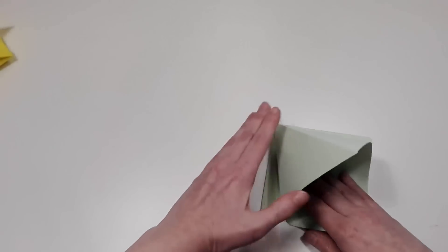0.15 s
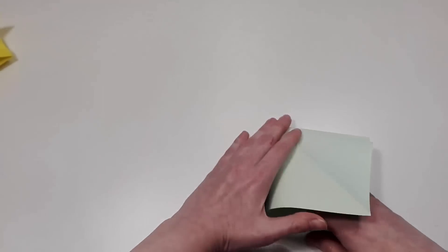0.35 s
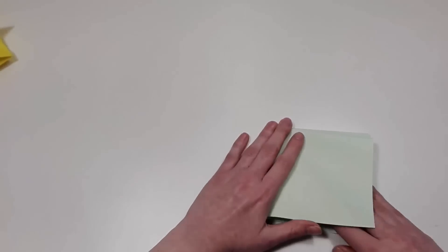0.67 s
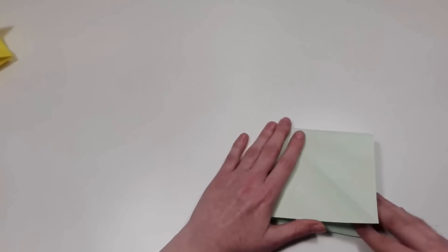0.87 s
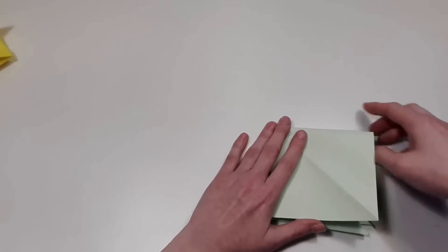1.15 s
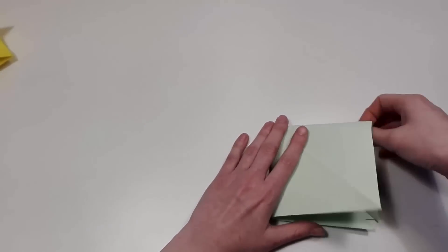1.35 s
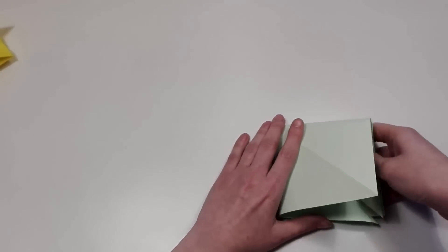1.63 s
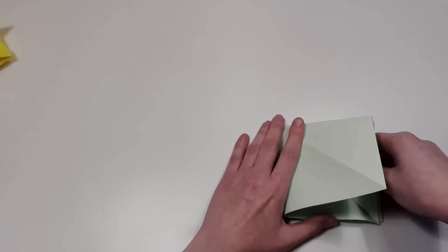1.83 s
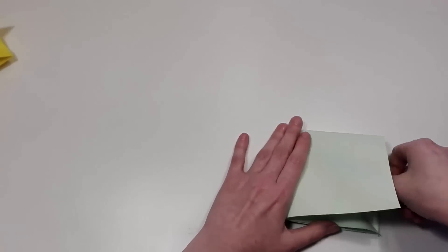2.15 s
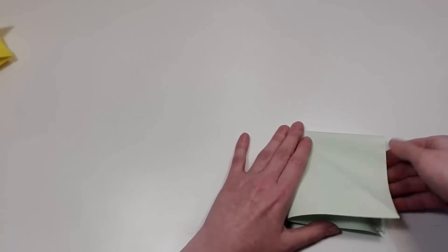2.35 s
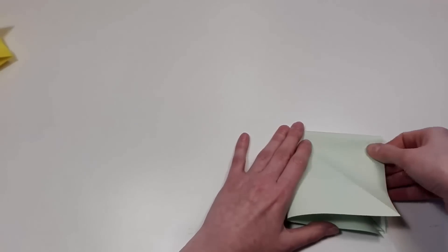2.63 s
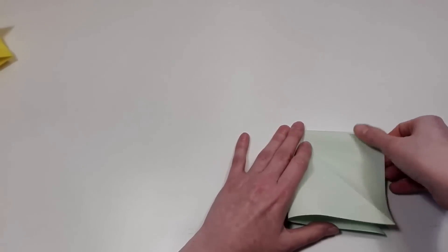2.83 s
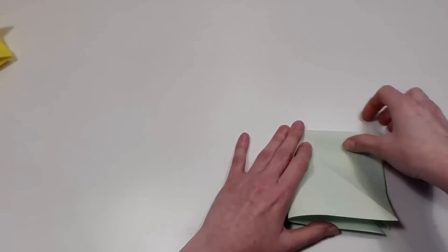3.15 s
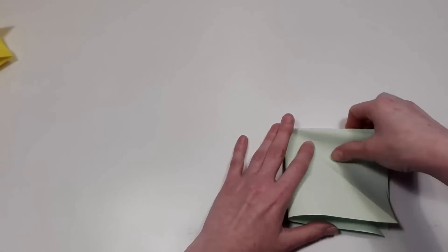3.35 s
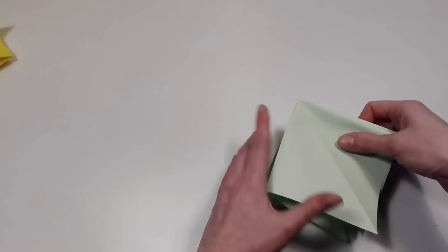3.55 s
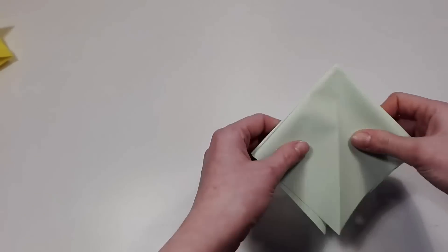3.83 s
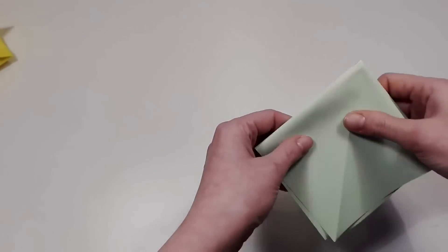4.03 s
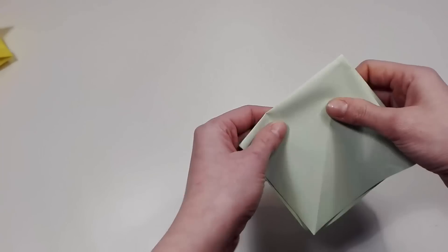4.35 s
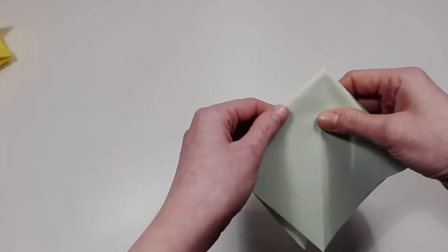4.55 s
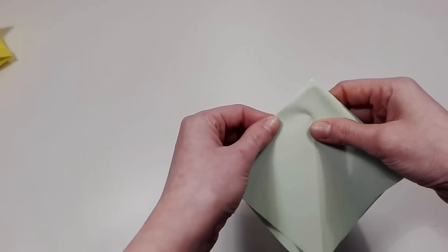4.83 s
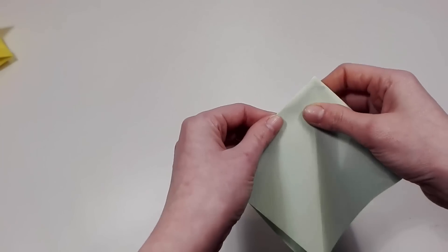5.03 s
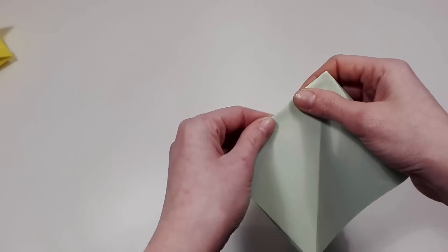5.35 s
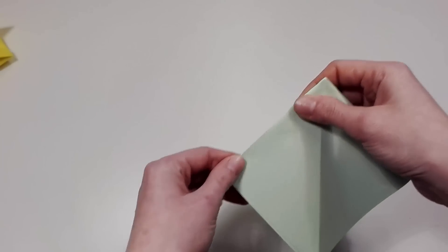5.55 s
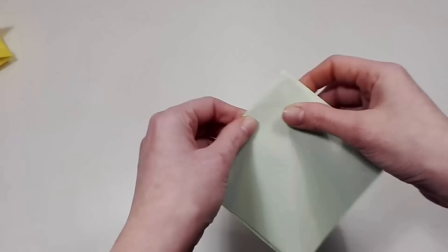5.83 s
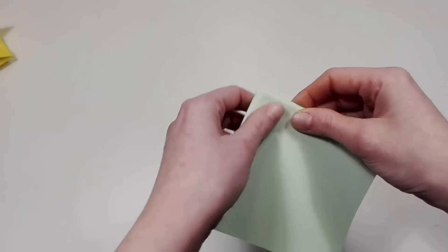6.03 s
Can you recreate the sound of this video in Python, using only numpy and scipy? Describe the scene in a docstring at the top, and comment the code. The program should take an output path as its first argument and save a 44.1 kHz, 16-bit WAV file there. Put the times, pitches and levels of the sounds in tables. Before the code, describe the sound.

Stiff paper snaps and crinkles as hands fold it close by, with soft rubbing and a few light table bumps in a quiet room.

```python
"""A sheet of paper snaps as hands fold and crease it, close to a small camera microphone in a quiet room.
Each buckling releases elastic energy in a burst of slips that cracks and rings a panel of the sheet,
and the room answers with a short tail. Friction of fingers and layers adds a fine hiss. The sheet lies
on a table at first and is later held in the air, where the fingers damp it. Hands bump and knock the
table and the microphone stand sways, over a faint room rumble."""
import sys
import numpy as np
from scipy import signal
from scipy.io import wavfile
from scipy.ndimage import uniform_filter1d

SR = 44100
rng = np.random.default_rng(int(sys.argv[2]) if len(sys.argv) > 2 else 0)


def int16_out(signal):
    """Quantize to a 16-bit WAV file."""
    q = np.round(np.clip(np.atleast_2d(signal).T, -1, 1) * 32767)
    wavfile.write(sys.argv[1], SR, q.astype(np.int16))


N = 272538
LIFT_S, LIFTED_DB = 3.6, -5.5  # from this time the sheet is held in the air and its panels settle quieter
PANEL_CARRY = 0.79  # share of the panel's dB that carries into the settling

# Buckling snaps. Each row: start in seconds, level in dB, crack centre in Hz, panel ring in dB,
# panel pitch in Hz, top fizz in dB, table push in dB. Ring, fizz and push are relative to the level.
SNAPS = [(0.0074, -24, 4760, -1, 1140, -35, -50), (0.17, -41, 2840, -1, 1720, -17, -17),
         (0.195, -37.5, 3040, -0.5, 1220, -22, -31), (0.277, -49.5, 2420, 6.5, 1160, -16, -9),
         (0.3195, -46.5, 2480, 13.5, 1800, -24, -27), (0.6002, -37, 4460, -1, 1440, -40, -24),
         (0.613, -35, 3180, -2, 1620, -32, -37), (0.667, -9.5, 2250, -4.5, 1580, -46, -41),
         (0.8122, -34.5, 5570, -1.5, 1900, -20, -37), (1.0054, -38.5, 5260, -12, 2150, -17, -32),
         (1.1865, -40.5, 5200, -0.5, 1120, -18, -5), (1.233, -12, 2570, -1.5, 2160, -52, -28),
         (1.3081, -28, 2650, 8, 1440, -27, -8), (1.3389, -23.5, 5530, -4, 1900, -31, -16.5),
         (1.4062, -19.5, 3660, -0.5, 1194, -5, -42), (1.4185, -30.5, 3860, 13, 1510, -31, -14),
         (1.5182, -5.5, 4880, -3.5, 1286, -33, -24), (1.7809, -19.5, 5150, -20.5, 1430, -16, -42),
         (1.828, -31.5, 4860, 13.5, 1140, -20, -43), (1.934, -22, 3340, -7.5, 1130, -30, -34),
         (1.989, -25, 3370, -10, 1950, -20, -38), (2, -23, 3530, -18, 2050, -35, -44),
         (2.01, -24, 3330, -11, 1460, -31, -44), (2.1458, -7.5, 4100, -13, 1780, -21, -51),
         (2.1676, -26, 3550, 2, 1360, -19, -12), (2.1815, -20.5, 3900, -1, 1270, -4.5, -18),
         (2.2684, 1, 5500, -8.5, 1404, -18, -30), (2.3799, -26.5, 5050, 0, 1300, -21, -42),
         (2.411, -26, 5000, -1, 1260, -16, -50), (2.42, -21, 5740, -11, 1800, -15, -46),
         (2.564, -41, 5050, 2, 2120, -22, -38), (2.611, -2, 4860, -7, 1186, -34, -56),
         (2.8062, -27.5, 5140, -13.5, 1280, -28, -46), (2.9195, -31.5, 2870, -12, 2000, -21, -47),
         (3.0094, -3, 2870, -15.5, 2090, -17, -63), (3.0247, -18, 4130, -9, 1750, -14, -44),
         (3.0324, -35, 2940, 7, 1850, -4, -39), (3.0677, -9, 5140, -6.5, 2250, -21, -33),
         (3.0696, -2, 4700, -19, 1300, -20.5, -44.5), (3.1744, -34.5, 5070, -3.5, 1140, -28, -6),
         (3.2823, -43.5, 4160, -3, 2090, -35, -10), (3.722, -38.5, 4750, -6.5, 1280, -18, -13),
         (4.046, -35, 5420, -9.5, 2100, -28, -22), (4.071, -26, 4210, -8, 1880, -20.5, -23),
         (4.0865, -1, 4520, -12, 2100, -30, -27), (4.2053, -37.5, 3310, 2.5, 1960, -22, -2),
         (4.3806, -27, 3250, 3, 1140, -34, -13), (4.4832, -38, 3810, -3, 2000, -19, -19),
         (4.712, -15, 3530, 0.5, 1190, -23.5, -22), (4.7589, -27, 3380, 3, 1210, -39, -24),
         (4.9188, -16, 3640, -12, 1870, -25, -31), (5.07, -34.5, 3300, -4.5, 1083, -42, -17.5),
         (5.3415, -13.5, 3480, -2, 2160, -37, -63), (5.827, -34, 5200, -3, 1920, -21, -11),
         (5.8566, -36.5, 2900, 2, 1800, -25, -6.5), (5.9397, -33.5, 5170, 0, 900, -28, -12),
         (6.0236, -42, 4910, 0, 1770, -21, -6.5), (6.1332, -37.5, 4510, 3.5, 1220, -21, -14)]


def buckling_snaps():
    """Snap-through buckling: a crease gives way in slips that crack, ring a panel and push the table."""
    direct, sends = np.zeros(N), np.zeros((3, N))
    ms, rise_ms = np.arange(1500) / SR * 1000, 0.694
    past_peak_ms = np.maximum(ms - rise_ms, 0)
    attack = np.minimum(ms / rise_ms, 1) ** 2
    flip = 2 * np.exp(-((ms - rise_ms) / 0.053) ** 2)  # the fold flips at the top of the burst
    shape = len(SNAPS), len(ms)
    slips = rng.standard_normal(shape) * gain_of(4.6 * rng.standard_normal(shape))
    hum_t = np.arange(8000) / SR
    shivers = rng.standard_normal((len(SNAPS), len(hum_t))) * np.exp(-hum_t / 0.053)
    for k, (start, db, crack_hz, panel_db, panel_hz, fizz_db, push_db) in enumerate(SNAPS):
        lifted = start > LIFT_S
        decay_scale, ring_share, room_db = (0.62, 0.33, -22) if lifted else (1, 0.51, -23.5)
        # a harder snap is shorter and sharper; faint ones crackle longer
        decay_ms = max(2.11 - 0.29 * db, .5) * decay_scale
        burst = slips[k] * attack * np.exp(-past_peak_ms / decay_ms) + flip
        treble_fade = np.exp(-past_peak_ms / 35)
        treble = band(band(burst * treble_fade, 2280, 7140), 2280, 7140)
        crack = 0.32 * ring(treble, crack_hz, width_hz=540) + 0.51 * treble
        sheet = band(burst, 1000, 2266)
        panel = ring_share * ring(sheet, panel_hz, width_hz=140) + (1 - ring_share) * sheet
        flash = burst * np.exp(-abs(ms - rise_ms) / .8)
        fizz = gain_of(fizz_db) * band(flash, 7300, 12000)
        bite = gain_of(-14 + 6.3 * db) * band(flash, 7300, 16000)  # heard only in the hardest snaps
        push = gain_of(push_db) * band(burst, 176, 1190)
        fringe = fizz + bite + push
        add(direct, start - .0004, gain_of(db) * (crack + gain_of(panel_db) * panel + fringe))
        # the struck panel hums on while the sheet settles
        hum_db = db + PANEL_CARRY * panel_db - 20 + LIFTED_DB * lifted
        add(direct, start, gain_of(hum_db) * ring(shivers[k], panel_hz, width_hz=215))
        # the room blurs the rings, and each spot of the sheet meets other echoes
        add(sends[k % 3], start, gain_of(db + room_db) * (treble + gain_of(panel_db) * sheet + fringe))
    return direct + sum(signal.oaconvolve(send, room_response())[:N] for send in sends)


# Spectra of friction hiss, sheet body and dry fizz. Each row: frequency in Hz, relative density in dB.
HISS_SPECTRUM = [(1060, -81), (1800, -18), (1960, 0), (2640, -1.5), (3260, 4.5), (4120, 1), (5250, 4.5),
                 (5970, 0), (9000, -18.5), (11700, -37.5), (19800, -120)]
BODY_SPECTRUM = [(290, -50), (500, -44.5), (938, -8), (1250, -1.5), (1490, -9.5), (2040, -1.5),
                 (2360, -4.5), (3200, -6), (4160, -11), (7040, -120)]
FIZZ_SPECTRUM = [(3820, -52), (6500, 10), (8400, 1.5), (9800, 2.5), (11500, -7.5), (13000, -6.5),
                 (14000, -9.5), (14600, -4.5)]
# Strokes of fingers and layers. Each row: time of reaching full level, hold, 20 dB rise and 20 dB fall
# in seconds, levels of hiss, body and fizz in dB, hiss centre in Hz.
STROKES = [(0.0, 0.031, .01, 0.04, -49, -53, -55.5, 5030),
           (0.175, 0.024, 0.013, 0.071, -56, -53, -64.5, 3580),
           (0.313, 0.035, 0.036, 0.14, -70, -57, -73, 4090), (0.514, .08, 0.043, .1, -58, -58, -66, 4880),
           (0.63, 0.16, 0.12, 0.1, -47.5, -54, -59, 4100), (0.779, .06, 0.082, 0.16, -48.5, -77, -51, 5780),
           (0.983, 0.022, 0.088, 0.032, -51, -58, -49.5, 5230),
           (1.282, 0.022, 0.069, 0.021, -37.5, -41.5, -44.5, 4560),
           (1.351, 0.048, 0.093, 0.17, -44, -46.5, -48.5, 4430),
           (1.552, 0.037, 0.054, 0.23, -43.5, -46.5, -51, 4400),
           (1.748, 0.082, 0.24, 0.14, -45.5, -55, -60, 4730),
           (1.81, 0.066, 0.057, 0.22, -64, -70, -55, 4900),
           (1.991, 0.029, .12, 0.07, -43.5, -46.5, -54.5, 3430),
           (2.151, 0.017, .03, 0.058, -36, -42, -41, 4340),
           (2.324, 0.079, 0.049, 0.092, -42.5, -47, -46, 4600),
           (2.561, 0.017, 0.016, 0.05, -55, -55, -60, 4630),
           (2.724, 0.018, 0.03, 0.043, -46, -49.5, -58, 3930),
           (2.805, 0.059, 0.024, 0.11, -46.5, -55.5, -55.5, 5020),
           (2.942, 0.028, .04, 0.039, -46, -56, -56, 4100),
           (2.997, 0.026, 0.045, 0.09, -37, -70, -45.5, 4040),
           (3.149, 0.062, .1, 0.055, -48, -63, -66, 4080), (3.285, .03, .01, 0.04, -47, -55, -54, 4460),
           (3.35, 0.042, 0.073, 0.045, -45.5, -56.5, -53, 4240),
           (3.458, .14, 0.11, 0.052, -57, -64.5, -63.5, 4600),
           (3.763, 0.05, 0.037, 0.13, -53.5, -60, -65, 4700),
           (3.943, 0.098, 0.19, 0.047, -48.5, -60.5, -60.5, 3990),
           (4.114, 0.073, 0.064, 0.1, -42, -54, -50, 4200),
           (4.294, 0.022, 0.061, 0.36, -44.5, -54.5, -52, 4020),
           (4.385, .06, 0.058, 0.077, -50, -55.5, -59, 4000),
           (4.484, 0.059, .04, 0.029, -42, -55, -52, 4460),
           (4.595, 0.058, 0.0074, 0.14, -47.5, -62, -59.5, 4140),
           (4.936, 0.024, 0.007, 0.15, -50, -63, -63.5, 4300),
           (5.051, 0.023, .05, 0.072, -49, -58.5, -60.5, 4300),
           (5.136, 0.04, 0.009, 0.03, -48, -76, -60, 4040),
           (5.277, 0.037, 0.14, 0.13, -49, -59.5, -66, 4500),
           (5.434, 0.029, 0.17, 0.12, -44.5, -66, -67, 5400),
           (5.487, 0.066, 0.16, 0.035, -43.5, -57, -43, 5070),
           (5.674, 0.037, 0.065, 0.028, -61.5, -67.5, -67, 4630),
           (5.832, 0.045, .01, .15, -51.5, -55, -63.5, 4350),
           (5.902, 0.055, 0.082, .12, -46.5, -56.5, -53, 4720),
           (6.025, .06, .06, 0.024, -49.5, -61, -56, 4760),
           (6.156, .04, 0.032, .1, -46.5, -50, -57.5, 4770)]


def sliding_friction():
    """Stick-slip friction: fibres catch and let go in every stroke and as each snap settles."""
    peak_s, hold_s, rise_s, fall_s, *stroke_levels, centre_hz = np.transpose(STROKES)
    snap_s, snap_db, _, panel_db, *_ = np.transpose(SNAPS)
    body_db = snap_db + PANEL_CARRY * panel_db + LIFTED_DB * (snap_s > LIFT_S)
    settle_levels = snap_db - 31.5, body_db - 31, snap_db - 51  # hiss, body, fizz
    settle_rise_s, settle_fall_s = 0.0027, 0.069

    def hiss_db(hz, t):
        """A spectral peak moves with the strokes; in the air the hiss loses its lower part."""
        peak = 12.2 * np.exp(-(np.log((hz + 1) / np.interp(t, peak_s, centre_hz)) / 0.47) ** 2)
        low_cut = -7 * (t > LIFT_S) / (1 + (hz / 3050) ** 10)
        return curve_at(HISS_SPECTRUM, hz) + peak + low_cut

    hiss = shaped_noise(hiss_db, size=512, patchy_db=2.5)
    body = shaped_noise(lambda hz, t: curve_at(BODY_SPECTRUM, hz), size=256, patchy_db=2.6)
    fizz = shaped_noise(lambda hz, t: curve_at(FIZZ_SPECTRUM, hz), size=256, patchy_db=2.5)
    catches = uniform_filter1d(rng.exponential(1, N) ** 2 - 2, size=150)
    roughness = unit_rms(gain_of(0.86 * unit_rms(catches)))
    rub = np.zeros(N)
    for layer, stroke_db, settle_db in zip([hiss, body, fizz], stroke_levels, settle_levels):
        stroking = swells(peak_s, rise_s, fall_s, stroke_db, hold_s)
        settling = swells(snap_s + settle_rise_s, settle_rise_s, settle_fall_s, settle_db)
        rub += layer * np.hypot(stroking, settling)
    return rub * roughness


# Fingertips knocking the table. Each row: start in seconds, level in dB, pitch in Hz, T60 in seconds.
KNOCKS = [(1.179, -33, 204, 0.13), (1.237, -36, 117, 0.15), (1.257, -26.5, 194.2, 0.17),
          (1.278, -31.5, 122, 0.18), (2.185, -26, 398, 0.036), (2.268, -50, 119, 0.032),
          (3.176, -36.5, 188, 0.078), (4.086, -30.5, 355, 0.043)]


def fingertip_knocks():
    """Damped free vibration: each knock rings one low mode of the board."""
    out, t = np.zeros(N), np.arange(6000) / SR
    attack = 1 - np.exp(-t / 0.0067)
    for start, db, hz, t60 in KNOCKS:
        add(out, start, gain_of(db - 60 * t / t60) * np.sin(2 * np.pi * hz * t) * attack)
    return out


# Spectrum of a thud in the board. Each row: frequency in Hz, relative density in dB.
THUD_SPECTRUM = [(76, -8), (130, 11.5), (211, 12.5), (294, 5.5), (422, 7), (528, -6), (700, -44),
                 (910, -37), (1540, -120)]
# Hands bumping the table. Each row: peak time, 20 dB rise and 20 dB fall in seconds, thud and boom in dB.
BUMPS = [(0.05, 0.062, 0.064, -57, -69), (1.19, 0.019, 0.16, -44.5, -69), (1.27, 0.044, 0.055, -36, -54),
         (1.36, .1, 0.14, -48, -58), (1.63, .3, 0.05, -57, -68), (1.84, 0.088, 0.55, -64, -83),
         (2.19, 0.08, 0.074, -45, -71), (2.268, 0.0095, 0.017, -41.5, -47), (2.63, 0.06, 0.15, -68, -76),
         (3.19, .08, .4, -56.5, -79), (3.33, .4, 0.066, -54, -74), (4.08, 0.041, 0.17, -51.5, -55),
         (4.39, 0.15, 0.051, -57.5, -72), (4.53, 0.18, 0.13, -63.5, -55.5), (4.72, 0.036, .06, -80, -75),
         (5.94, 0.023, 0.043, -49.5, -65.5), (6.16, .07, 0.18, -55, -59)]


def table_bumps():
    """Forced vibration: soft, slow contacts drive the board mainly at low frequencies."""
    peak_s, rise_s, fall_s, thud_db, boom_db = np.transpose(BUMPS)
    thud = shaped_noise(lambda hz, t: curve_at(THUD_SPECTRUM, hz), size=1024, patchy_db=2.5)
    boom = unit_rms(band(rng.standard_normal(N), 34.3, 146))
    thud *= np.hypot(resting_gain(-68.5), swells(peak_s, rise_s, fall_s, thud_db))
    boom *= np.hypot(resting_gain(-70), swells(peak_s, rise_s, fall_s, boom_db))
    return thud + boom


# Sways of the microphone stand. Each row: start in seconds, length in seconds, level in dB.
SWAYS = [(4.416, 0.218, -42), (4.818, 0.208, -49.5)]


def stand_sway():
    """Structure-borne noise: the swaying stand moves the microphone, mostly below the audible range."""
    rumble = unit_rms(band(rng.standard_normal(N), 10.04, 25.7))
    swing, t = np.zeros(N), np.arange(N) / SR
    for start, length, db in SWAYS:
        outside_s = np.maximum(start - t, t - start - length).clip(0)
        swing += gain_of(db - 20 * outside_s / 0.021)
    return rumble * np.hypot(resting_gain(-60), swing)


# Decay of the room. Each row: frequency in Hz, T60 in seconds, relative level in dB.
ROOM_DECAY = [(497, 0.31, 12), (1300, 0.23, 0), (3620, 0.31, -0.5), (9100, 0.15, 2)]


def room_response():
    """Reverberation: sparse reflections of random sign decay exponentially, each band at its own rate."""
    taps = np.zeros(SR // 2)
    slots = np.arange(160, len(taps) - 12, 12)
    taps[slots + rng.integers(0, 12, len(slots))] = rng.choice([-1., 1.], len(slots))
    hz, t, spectra = signal.stft(taps, SR, nperseg=128)
    room = np.array(ROOM_DECAY)
    t60, start_db = curve_at(room[:, :2], hz[:, None]), curve_at(room[:, ::2], hz[:, None])
    echoes = signal.istft(spectra * gain_of(start_db - 60 * t / t60), SR, nperseg=128)[1]
    return echoes / np.sqrt(SR / 3000)


# Spectrum of room rumble and microphone hiss. Each row: frequency in Hz, relative density in dB.
FLOOR_SPECTRUM = [(12, -11), (20, 1), (36, 17.5), (91, -13.5), (146, 9), (209, -24), (275, -52), (579, -11),
                  (1150, -1), (1650, -7.5), (2710, -12.5), (5410, -10), (8180, -15), (13400, -14),
                  (14600, -16)]
# Narrow bands in the rumble. Each row: centre in Hz, width in Hz, level in dB.
DRONE_BANDS = [(154.3, 4.36, -70.5), (201, 15, -70)]


def noise_floor():
    """Stationary noise: broad rumble and hiss, with narrow bands that waver as a drone."""
    drone = sum(gain_of(db) * unit_rms(ring(rng.standard_normal(N), hz, width_hz))
                for hz, width_hz, db in DRONE_BANDS)
    floor = shaped_noise(lambda hz, t: curve_at(FLOOR_SPECTRUM, hz), size=2048, patchy_db=.4)
    return drone + gain_of(-63.5) * floor


def gain_of(db):
    return 10 ** (np.asarray(db) / 20)


def unit_rms(x):
    return x / np.sqrt(np.mean(x ** 2) + 1e-20)


def curve_at(points, hz):
    """Interpolation on a logarithmic frequency axis."""
    point_hz, values = np.transpose(points)
    return np.interp(np.log(hz + 1), np.log(point_hz + 1), values)


def add(mix, start_s, sound):
    part = mix[round(start_s * SR):][:len(sound)]
    part += sound[:len(part)]


def ring(x, hz, width_hz):
    """Two-pole resonance, scaled to a peak of 1."""
    radius = np.exp(-np.pi * width_hz / SR)
    y = signal.lfilter([1, 0, -1], [1, -2 * radius * np.cos(2 * np.pi * hz / SR), radius ** 2], x)
    return y / abs(y).max()


def band(x, lo_hz, hi_hz):
    """Band-pass filtering, scaled to a peak of 1."""
    y = signal.sosfilt(signal.butter(3, [lo_hz, hi_hz], "band", fs=SR, output="sos"), x)
    return y / abs(y).max()


def low_pass(x, hz):
    return signal.oaconvolve(x, signal.firwin(511, hz, window=("kaiser", 9), fs=SR)[None], "same")


def shaped_noise(field_db, size, patchy_db):
    """Spectral shaping: noise of unit RMS follows field_db(Hz, s), with drifting patches."""
    hop = size // 4
    hz, t = np.fft.rfftfreq(size, 1 / SR)[:, None], np.arange(N // hop + 5) * hop / SR
    real, imag, patches = rng.standard_normal((len(t), len(hz), 3)).T
    patches = unit_rms(uniform_filter1d(uniform_filter1d(patches, size=5, axis=0), size=9, axis=1))
    spectra = (real + 1j * imag) * gain_of(field_db(hz, t) + patchy_db * patches)
    return unit_rms(signal.istft(spectra, nperseg=size, noverlap=size - hop)[1][:N])


def swells(peak_s, rise_s, fall_s, db, hold_s=0):
    """Incoherent addition: gain of swells that climb 20 dB in rise_s, hold and drop 20 dB in fall_s."""
    hop = 32
    t = np.arange(0, N + 2 * hop, hop)[:, None] / SR - peak_s
    rising, falling = -t / np.maximum(rise_s, .003), (t - hold_s) / np.maximum(fall_s, .003)
    down_db = 20 * np.maximum(rising, falling).clip(0)
    gain = np.sqrt((gain_of(db - down_db) ** 2).sum(1))
    return np.interp(np.arange(N) / hop, np.arange(len(gain)), gain)


def resting_gain(db):
    """Random modulation: the resting table is never quite still, so the level wanders by 2 dB."""
    wander = uniform_filter1d(rng.standard_normal(N), size=round(0.1 * SR))
    return gain_of(db + 2 * unit_rms(wander))


def scene():
    """Superposition: all sources add, alike in both channels."""
    paper = buckling_snaps() + sliding_friction()
    return np.tile(paper + fingertip_knocks() + table_bumps() + stand_sway() + noise_floor(), (2, 1))


# Stereo spread of quiet sound. Each row: frequency in Hz, side signal relative to the middle in dB.
STEREO_SPREAD = [(200, -46.5), (500, -33), (1300, -44), (2400, -53), (4400, -41), (6200, -9), (8100, -4.5),
                 (14000, -6)]


def record(dry):
    """Decorrelation and clipping: noise widens the treble, less when loud; the hardest snaps overload."""
    hz, _, spectra = signal.stft(dry[0], SR, nperseg=256)
    real, imag = rng.standard_normal((*spectra.T.shape, 2)).T
    magnitude = uniform_filter1d(abs(spectra), size=5, axis=0)
    share = gain_of(curve_at(STEREO_SPREAD, hz))[:, None] / (1 + magnitude / gain_of(-58.5)) ** 1.05
    side = signal.istft(magnitude * share * (real + 1j * imag), SR, nperseg=256)[1][:N]
    stereo = low_pass(dry + np.array([side, -side]), hz=14450)
    return low_pass(np.clip(stereo, -.93, .93), hz=16400)


dry = scene()
out = record(dry)
int16_out(out)
```